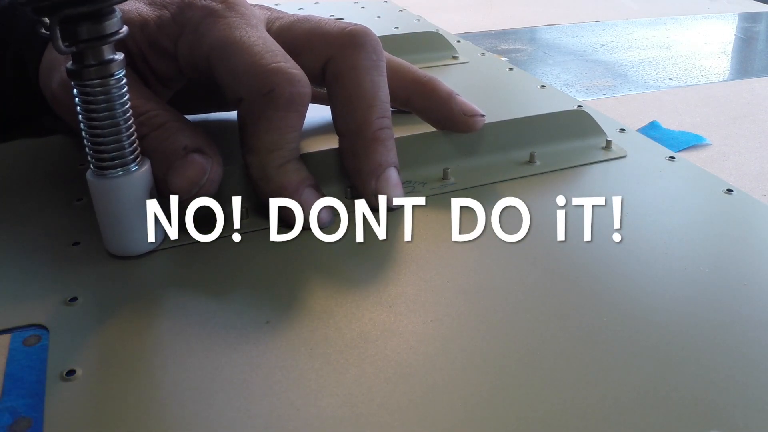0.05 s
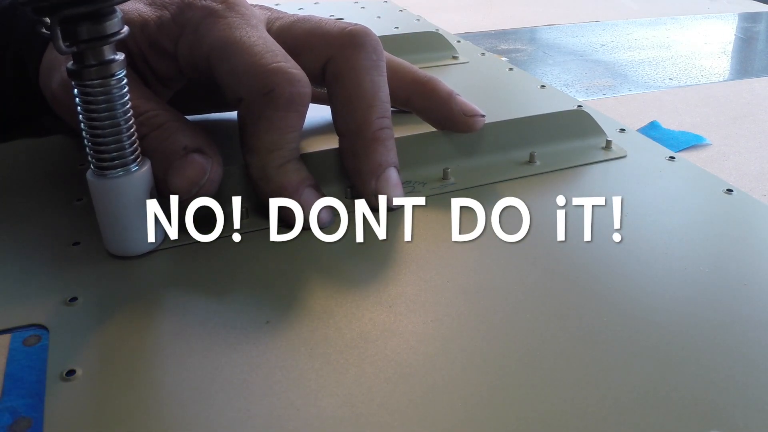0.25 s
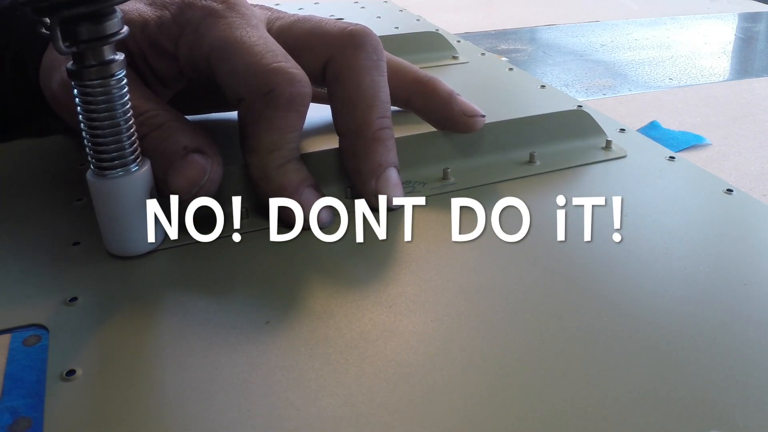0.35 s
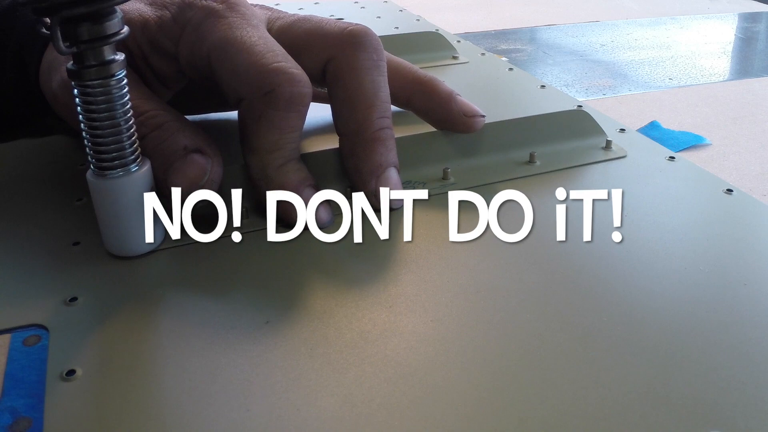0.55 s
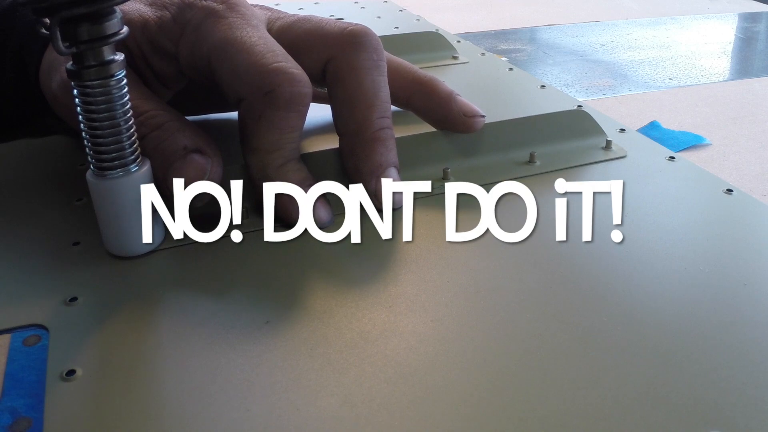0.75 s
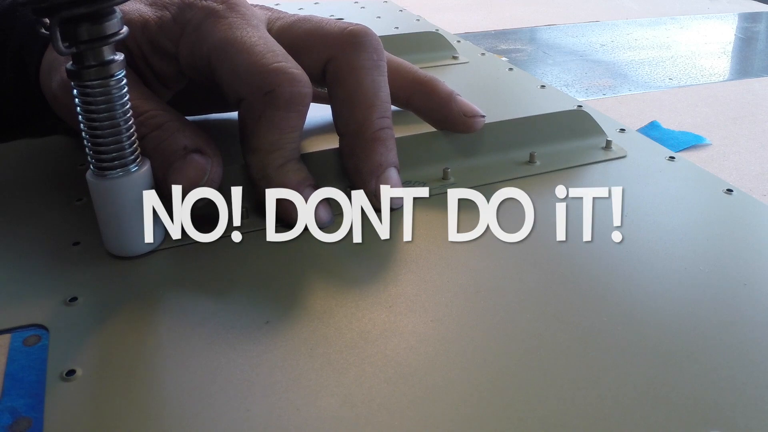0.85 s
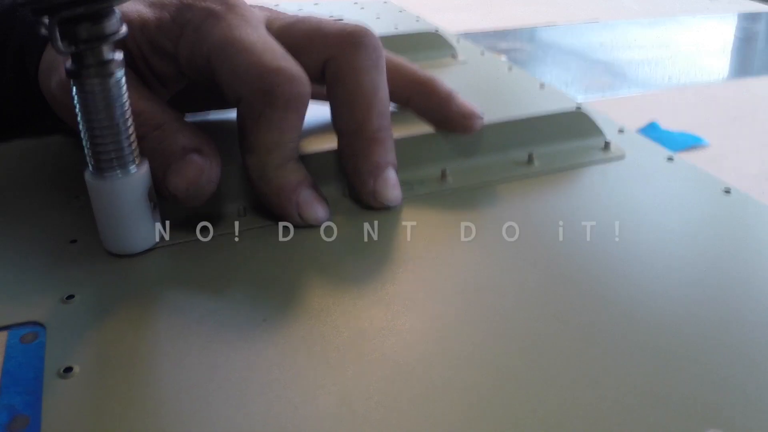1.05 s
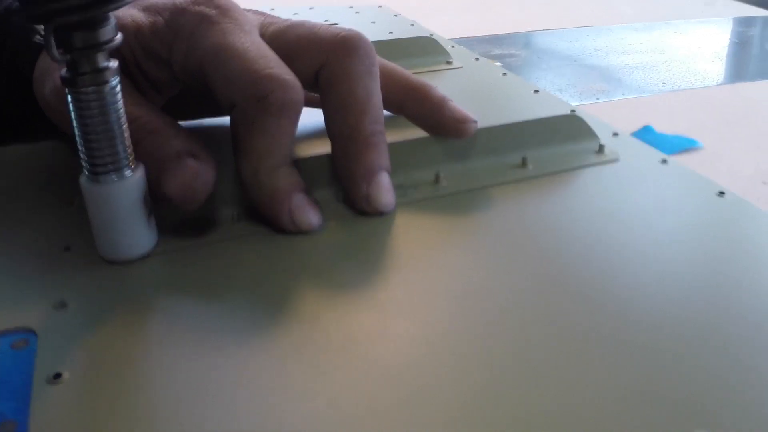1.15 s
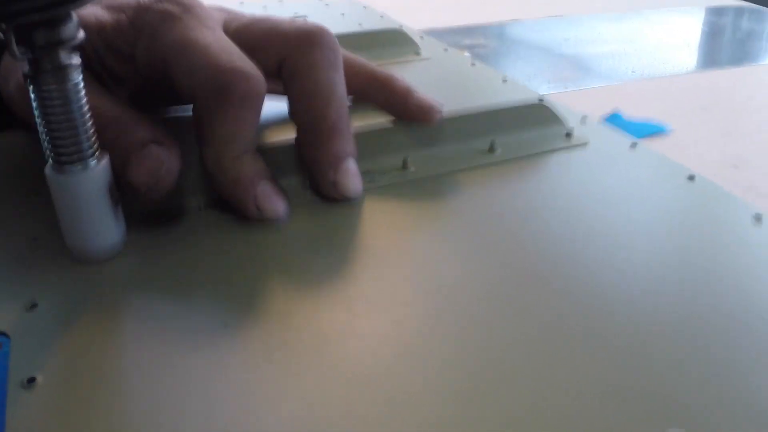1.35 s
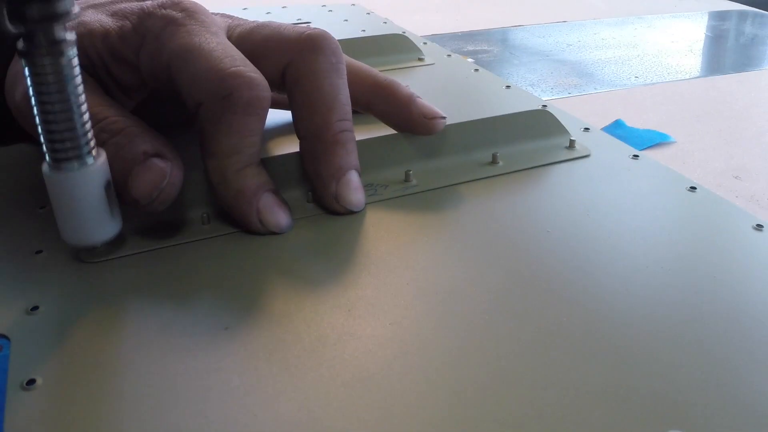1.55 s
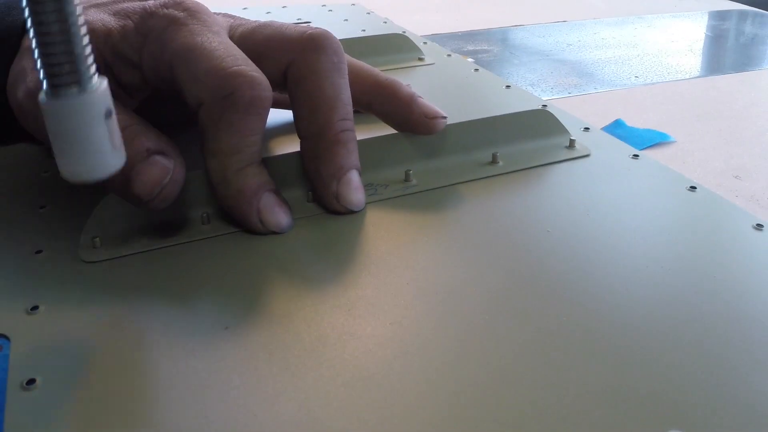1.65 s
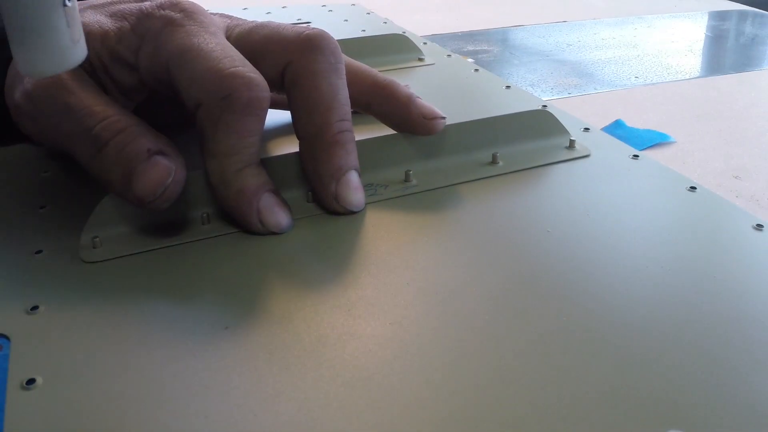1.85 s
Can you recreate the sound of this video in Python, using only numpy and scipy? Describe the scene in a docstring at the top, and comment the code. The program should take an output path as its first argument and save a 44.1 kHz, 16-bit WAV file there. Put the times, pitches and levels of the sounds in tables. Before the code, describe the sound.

In a workshop, a pneumatic rivet gun leaks a steady hiss of air, then sets one rivet with seven quick, loud metallic blows. Heard up close, the aluminium sheet rings and a short room echo dies away.

```python
"""An air rivet gun in a workshop

Close to the microphone, air hisses through the half-open trigger valve and the piston breaks free.
It sets one rivet in an aluminium panel with a quick burst of six blows and one late blow.
Each blow thuds, cracks and rings the same sheet; the room echoes and the loudest peaks overload."""
import sys
import numpy as np
from scipy import signal
from scipy.fft import rfft, irfft
from scipy.io import wavfile

SR = 44100
rng = np.random.default_rng(int(sys.argv[2]) if len(sys.argv) > 2 else 0)


def digitize_waveform(pressure):
    """Quantize a signal to 16-bit integers and store it at the path in sys.argv[1].

    Rows of a 2-D input are taken as channels; values are limited to [-1, 1].
    """
    field = np.atleast_2d(pressure).T
    bounded = np.clip(field, -1, 1)
    quanta = np.round(bounded * 32767).astype(np.int16)
    wavfile.write(sys.argv[1], SR, quanta)


N = 83790

# How loud the background rumble is. Each row: time in seconds, level in dB.
RUMBLE_LEVELS = [(0, -51.5), (.2, -48), (.33, -46), (.55, -51), (1.55, -44), (1.69, -43), (1.9, -58)]
# The rumble's tone. Each row: frequency in Hz, level in dB.
RUMBLE_TONE = [(20, 1.5), (40, -4.5), (100, -8), (350, -14.5), (1200, -20), (3000, -48), (12000, -79)]
# The tone of the room's echo. Each row: frequency in Hz, level in dB.
ROOM_TONE = [(30, -8), (150, -5), (280, 2), (480, -4), (585, -8.5), (700, -7), (1600, -5.5), (2800, -20.5),
             (4600, -21.5), (8000, -30.5), (15000, -37.5)]
# How long the room rings. Each row: frequency in Hz, seconds to fade by 60 dB.
ROOM_FADES = [(100, 0.65), (400, 0.79), (1500, 0.69), (5000, 0.54), (12000, 0.42)]
# Air flowing through the valve. Each row: time in seconds, level in dB.
AIR_FLOW = [(0, -34.5), (.015, -31.5), (.05, -37), (.186, -35.5), (.199, -24.5), (.235, -24), (.29, -22),
            (.54, -21.5), (.6, -22), (.9, -21), (1.04, -18), (1.085, -18.5), (1.1, -23.5), (1.125, -18.5),
            (1.142, -40), (1.45, -59.5), (1.6, -53), (1.7, -77), (1.9, -100)]
# The air jet's tone. Each row: frequency in Hz, level in dB.
JET_TONE = [(30, -32.5), (300, -24), (900, -18.5), (1190, -24), (1320, -7), (2700, -6.5), (2980, -13.5),
            (3250, -3), (6500, -2.5), (8500, -11), (10000, -19.5), (15000, -26.5)]
# Resonances of the air passages. Each row: frequency in Hz, width in Hz, boost or cut in dB.
AIR_PASSAGES = [(2020, 430, 4), (2410, 50, -17), (4475, 420, 9), (5590, 87, -10), (6850, 83, 6),
                (7200, 230, -16.5), (7260, 420, 6.5), (8670, 340, 4.5), (9360, 210, 7.5), (11020, 690, 8),
                (12560, 720, 7.5), (14120, 350, 6), (15000, 350, 2)]
# A hollow rush in the gun just before it fires. Each row: time in seconds, level in dB.
RUSH_LEVELS = [(.9, -70), (.99, -35.5), (1.035, -23.5), (1.075, -44.5), (1.13, -56)]
# Spits from the valve. Each row: start in seconds, hiss in dB, thump in dB, hold in seconds.
VALVE_SPITS = [(1.1003, -32.5, -15, 0.0045), (1.1294, -9.5, -3.5, 0.0029), (1.641, -33, -38, 0.0012)]
# A spit's tone. Each row: frequency in Hz, level in dB.
SPIT_TONE = [(300, -18.5), (2000, -1), (3200, -18), (4600, -3), (7000, -15), (9000, -24), (13000, -18.5),
             (15000, -37.5)]
# The gun body's thump. Each row: frequency in Hz, level in dB, seconds to fade by 60 dB.
GUN_MODES = [(130.5, -12.5, 0.04), (256, 1.5, 0.01), (390, -9.5, 0.03), (1350, -8, .008)]
# The piston rattles back between blows. Each row: start in seconds, level in dB.
PISTON_RETURNS = [(1.1795, -38), (1.2327, -37), (1.287, -38), (1.342, -35), (1.3997, -37), (1.472, -51)]
# The dense ring of sheet and bench. Each row: frequency in Hz, level in dB.
SHEET_TONE = [(60, -14.5), (150, -12), (350, -4), (490, -5), (580, -8.5), (660, -2), (900, -2.5),
              (1250, -3.5), (1600, -11), (1930, 1), (2400, -13.5), (5000, -24.5)]
# The panel's lasting notes. Each row: frequency in Hz, level in dB, seconds to fade by 60 dB.
PANEL_MODES = [(110.3, -46, 1.3), (265, -32.5, 0.6), (380.6, -34, 0.79), (479, -37, 0.69), (710, -58, 0.37),
               (725, -45, 0.16), (873.5, -34, 0.75), (910, -43, 0.83), (1225, -38, .4), (1313, -32.5, 0.55),
               (1435, -42.5, 0.46), (1734, -37.5, 0.17), (1896, -42, 0.64)]
# The sheet's thud under the tool. Each row: frequency in Hz, level in dB, seconds to fade by 60 dB.
THUD_MODES = [(100, -30, 0.054), (170, -19, 0.03), (360.3, -10, 0.026), (453, -9.5, 0.023),
              (680, -16.5, 0.016), (885, -13.5, 0.0073), (1218, -9.5, 0.015), (1606, -11, 0.0107),
              (1825, -20, 0.021), (2370, -24.5, 0.0093), (3460, -50, .008)]
# The tone of metal hitting metal. Each row: frequency in Hz, level in dB.
CRACK_TONE = [(300, -10.5), (1500, 7.5), (3000, 0), (6000, -5.5), (8300, -9.5), (9500, -12), (12500, -12.5),
              (15000, -27)]
# The hammer blows. Each row: start in seconds, then the thud, crack and ring gains in dB.
HAMMER_BLOWS = [(1.1485, 5, 7.5, 2), (1.2039, 0.5, 3, 0.5), (1.2582, 1.5, 0.5, -1), (1.3133, 1, 1, 0.5),
                (1.3685, 0, 1, 0), (1.4277, 1.5, 0, 1.5), (1.5371, -5.5, -4.5, -0.5)]

TIME = np.arange(N) / SR  # seconds


def gain(db):
    """Turn decibels into a number to multiply by."""
    return 10 ** (np.asarray(db) / 20)


def normalise(x):
    """Scale a sound to an average (rms) level of 1."""
    return x / np.sqrt(np.mean(x ** 2))


def look_up(points, hz):
    """Read between a table's rows, giving every octave equal room."""
    frequencies, values = np.array(points).T
    return np.interp(np.log(hz + 1), np.log(frequencies), values)


def noise(tone, resonances=()):
    """Noise with a broad tone, plus bell-shaped peaks and dips."""
    hz = np.arange(N // 2 + 1) * SR / N
    bells = sum(lift * .5 ** ((2 * (hz - centre) / width) ** 2) for centre, width, lift in resonances)
    return normalise(irfft(rfft(rng.standard_normal(N)) * gain(look_up(tone, hz) + bells), N))


def fade(start, t60, hold=0):
    """Switch on at start, stay for hold, then fall 60 dB every t60 (all in seconds)."""
    age = TIME - start
    return (age >= 0) * np.exp(-np.log(1000) * np.maximum(age - hold, 0) / t60)


def ring(modes, hold=0):
    """A struck object's own notes (modes) start together and die away."""
    return sum(gain(db) * np.cos(2 * np.pi * hz * TIME) * fade(0, t60, hold) for hz, db, t60 in modes)


def play_at(events, sound):
    """Play a copy of the sound for each pair of start in seconds and gain in dB."""
    taps = np.zeros(N)
    for start, db in events:
        taps[int(start * SR)] = gain(db)
    return signal.fftconvolve(taps, sound)[:N]


def soften(x, cutoff_hz=4530):
    """A strike takes a moment of contact, which dulls its treble."""
    return signal.sosfilt(signal.butter(2, cutoff_hz, fs=SR, output="sos"), x)


def rumble():
    """A low background that swells a little as the gun comes off the work."""
    return gain(np.interp(TIME, *np.array(RUMBLE_LEVELS).T)) * noise(RUMBLE_TONE)


def room_echo(level_db=-25.5, build_s=.038):
    """The workshop's wash of echoes fades octave by octave; the treble dies first."""
    hz = np.arange(N // 2 + 1) * SR / N
    spectrum, out = rfft(noise(ROOM_TONE)), 0
    centres = 62.5 * 2 ** np.arange(9)
    for centre, share in zip(centres, np.eye(len(centres))):
        band = irfft(spectrum * look_up(np.c_[centres, share], hz), N)
        out = out + band * fade(0, look_up(ROOM_FADES, centre))
    return gain(level_db) * out * (1 - np.exp(-TIME / build_s))


def air_hiss(flutter_hz=62.1, flutter_db=.6, rush_hz=1380, rush_width_hz=570):
    """The jet sounds the gun's passages, with a puff at each piston return and one hollow rush."""
    flow = gain(np.interp(TIME, *np.array(AIR_FLOW).T))
    puffs = gain(4.5) * sum(gain(db) * fade(start, t60=.039) for start, db in PISTON_RETURNS)
    flutter = np.interp(TIME * flutter_hz, np.arange(N), rng.standard_normal(N))  # random level wobble
    hollow = signal.lfilter(*signal.iirpeak(rush_hz, rush_hz / rush_width_hz, fs=SR), noise(JET_TONE))
    swell = gain(np.interp(TIME, *np.array(RUSH_LEVELS).T, left=-np.inf, right=-np.inf))
    hiss = (flow + puffs) * gain(flutter_db * flutter) * noise(JET_TONE, AIR_PASSAGES)
    return hiss + swell * normalise(hollow)


def valve_spits():
    """Short spits of air, each setting off a low thump in the gun's body."""
    bursts = sum(gain(db) * fade(start, t60=.032, hold=hold) for start, db, _, hold in VALVE_SPITS)
    thumps = play_at([(start, db) for start, _, db, _ in VALVE_SPITS], soften(ring(GUN_MODES)))
    return bursts * noise(SPIT_TONE) - thumps


def piston_clicks():
    """A light click each time the piston reaches the back of the barrel."""
    return sum(gain(db) * fade(start, t60=.045) for start, db in PISTON_RETURNS) * noise(CRACK_TONE)


def seating_knock(start=1.1183, hz=1750, level_db=-1.5):
    """One short, pitched knock as the gun's tip settles on the rivet."""
    age = TIME - start
    rise = np.clip(age * hz * 2, 0, 1)  # takes half a cycle
    return gain(level_db) * np.cos(2 * np.pi * hz * age) * fade(start, t60=.0035, hold=.0011) * rise


def sheet_ring(count=110, spacing_hz=47, gain_db=-27, build_s=.003):
    """A thin plate's many short notes, about evenly spaced, build up as bending waves spread."""
    t = TIME[:N // 4]
    chance = rng.random((count, 2))
    hz = spacing_hz * (1 + np.arange(count) + chance[:, 0])
    phases = chance[:, 1:]
    waves = gain(look_up(SHEET_TONE, hz)) @ np.sin(2 * np.pi * (hz[:, None] * t + phases))
    waves *= 1 - np.exp(-t / build_s)
    return gain(gain_db) * np.pad(waves, (0, N - len(t))) * fade(0, t60=.11)


def hammer_blows(crack_base_db=-18.5, sizzle_db=-6, bounce_s=.0108, bounce_db=-18):
    """Each blow sets off the same thud, panel ring and room echo, and a partly new crack."""
    thud = ring(THUD_MODES, hold=.0019)
    thud = soften(thud + play_at([(bounce_s, bounce_db)], thud))  # the nearest hard surface throws it back
    ringing = soften(ring(PANEL_MODES)) + sheet_ring() + room_echo()
    repeated, fresh = noise(CRACK_TONE), gain(-2.5) * noise(CRACK_TONE)
    out = np.zeros(N)
    for start, thud_db, crack_db, ring_db in HAMMER_BLOWS:
        offset = int(start * SR)
        snap = fade(start, t60=.007, hold=.0022)
        sizzle = gain(sizzle_db) * fade(start, t60=.029)  # the crack's faint tail
        out += gain(crack_base_db + crack_db) * (snap + sizzle) * (np.roll(repeated, offset) + fresh)
        out += np.pad(gain(thud_db) * thud + gain(ring_db) * ringing, (offset, 0))[:N]
    return out


def scene():
    """The gun and the background, heard by one close microphone."""
    gun = air_hiss() + valve_spits() + seating_knock() + hammer_blows() + piston_clicks()
    return (gun + rumble())[None]


def record(dry):
    """The microphone drops the deepest bass and rounds off the loudest peaks; the top treble is cut."""
    low_cut_hz, top_hz, hardness = 15, 15300, 6
    x = signal.sosfilt(signal.butter(1, low_cut_hz, "high", fs=SR, output="sos"), dry)
    rounded = x / (1 + np.abs(x) ** hardness) ** (1 / hardness)
    return signal.sosfilt(signal.ellip(10, .2, 80, top_hz, fs=SR, output="sos"), rounded)


dry = scene()
out = record(dry)
digitize_waveform(out)
```